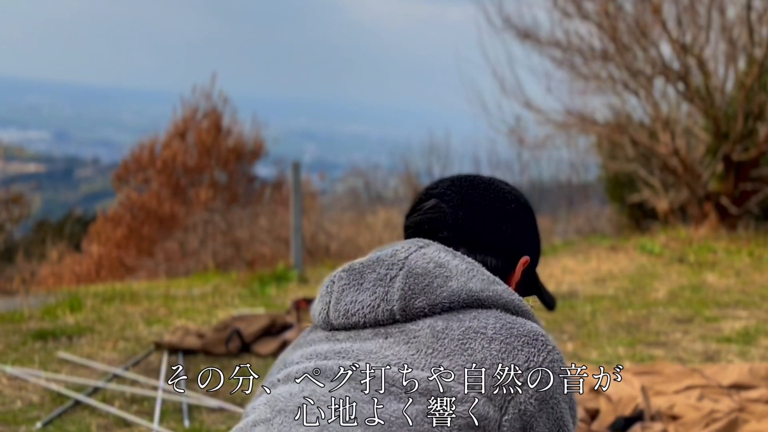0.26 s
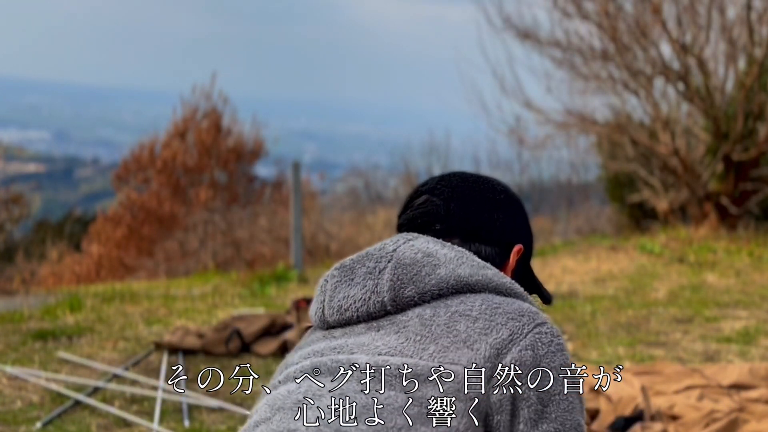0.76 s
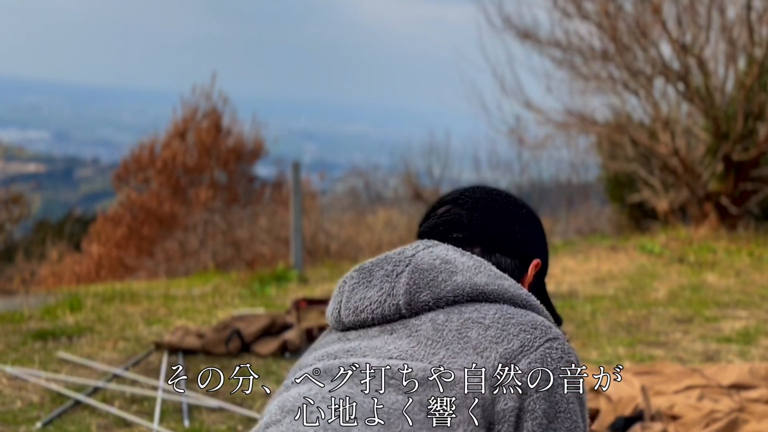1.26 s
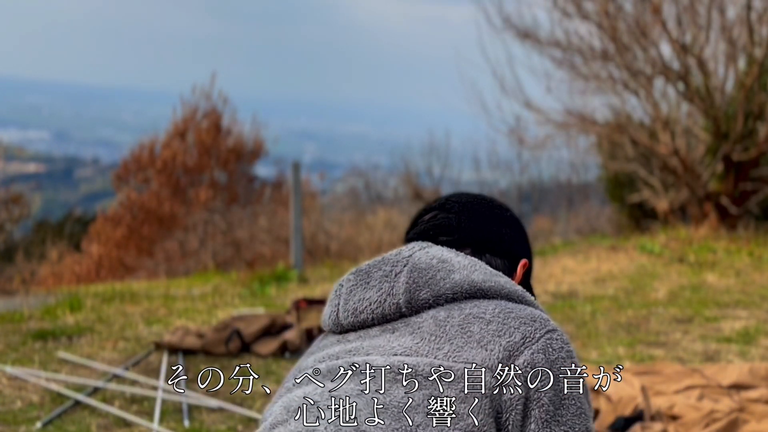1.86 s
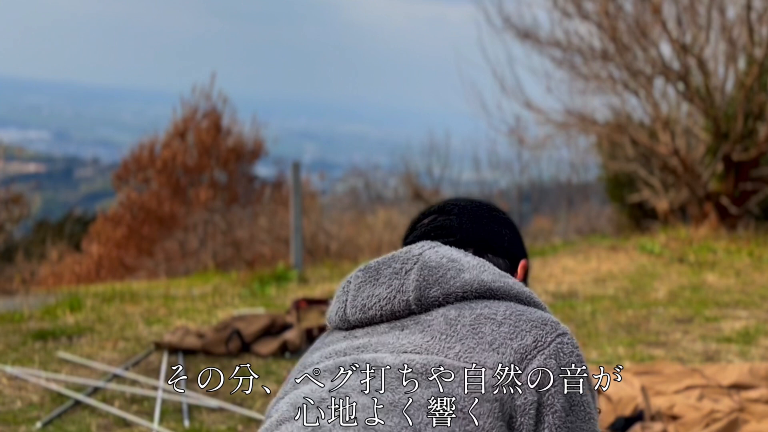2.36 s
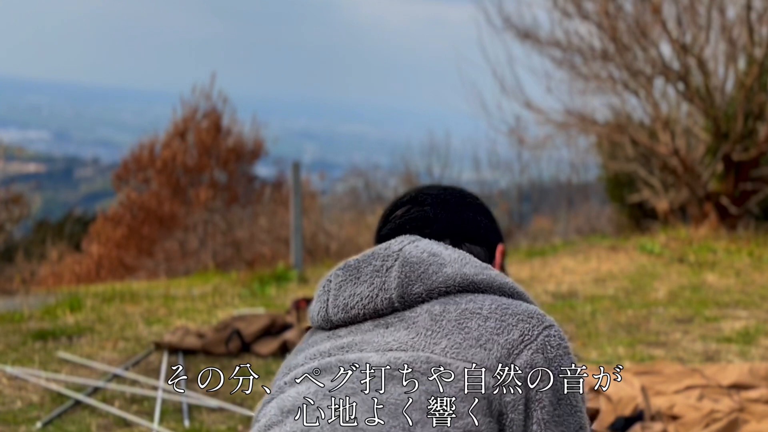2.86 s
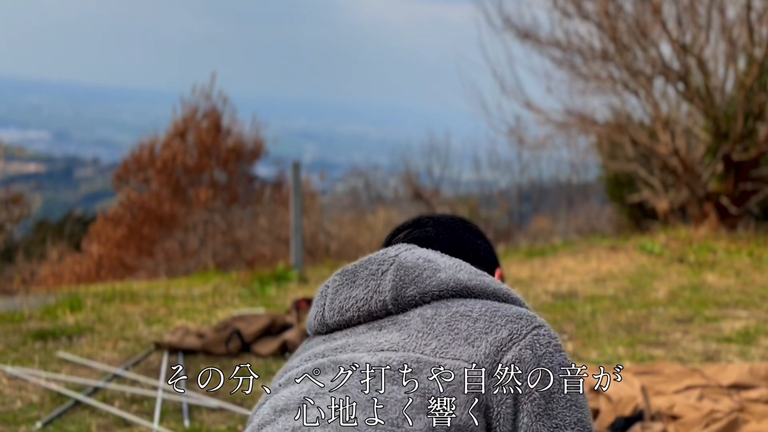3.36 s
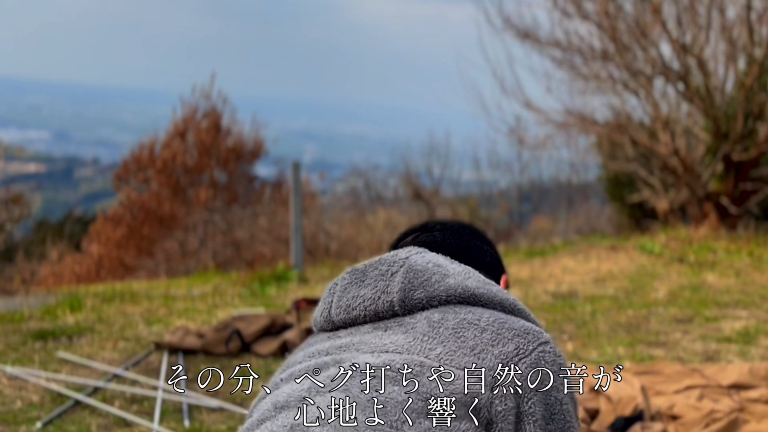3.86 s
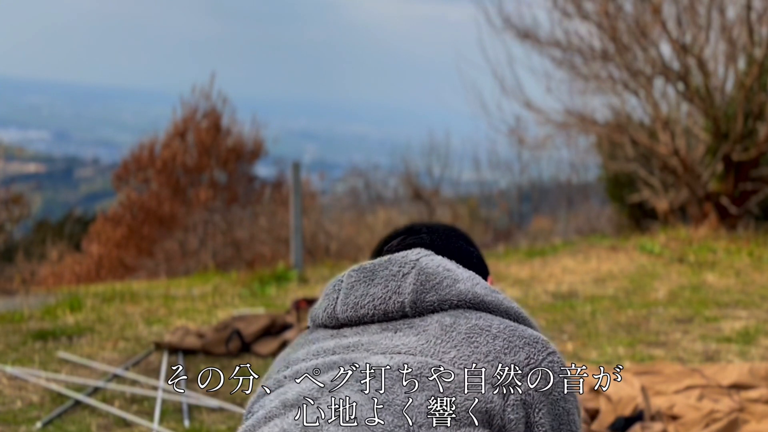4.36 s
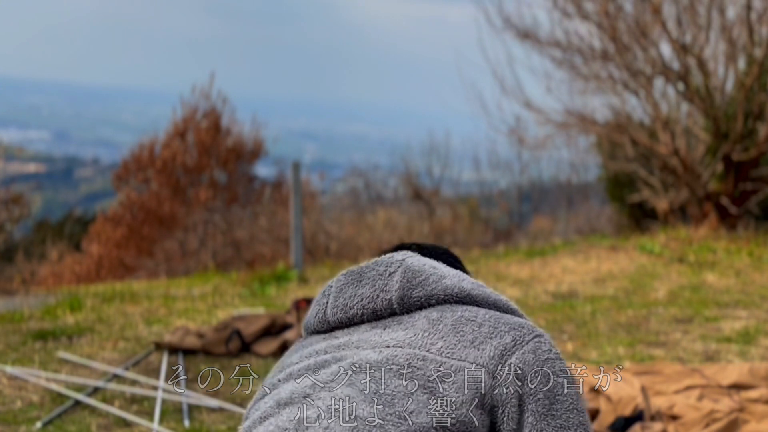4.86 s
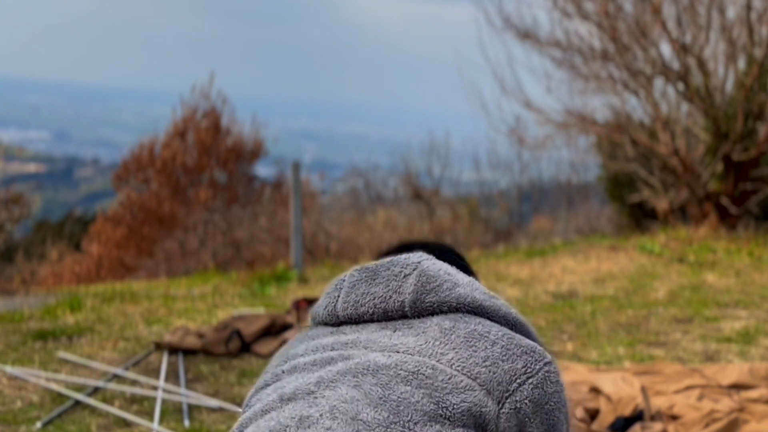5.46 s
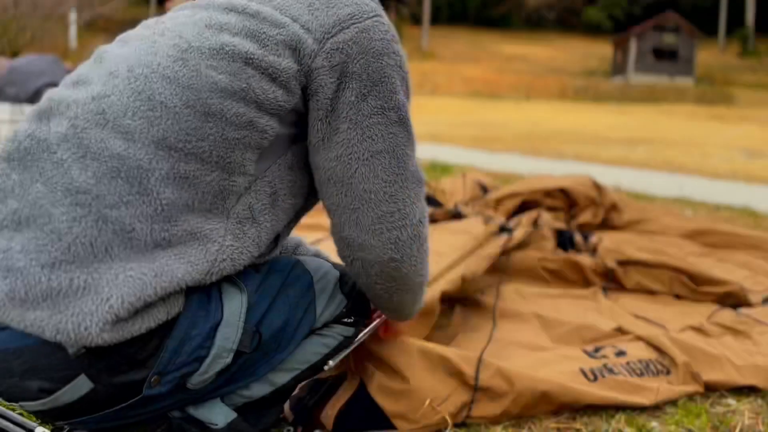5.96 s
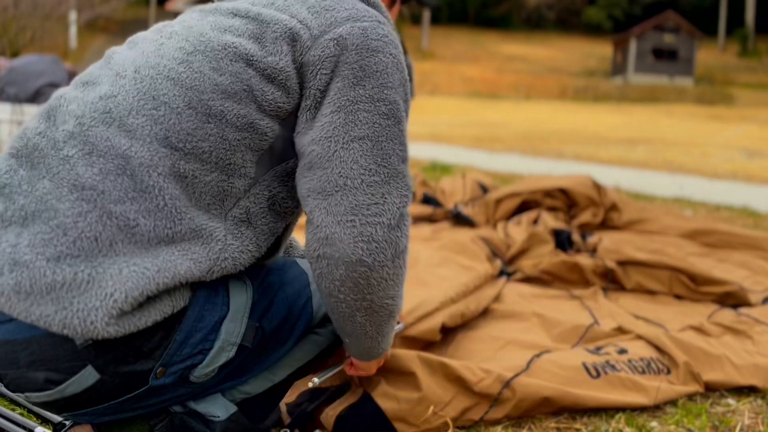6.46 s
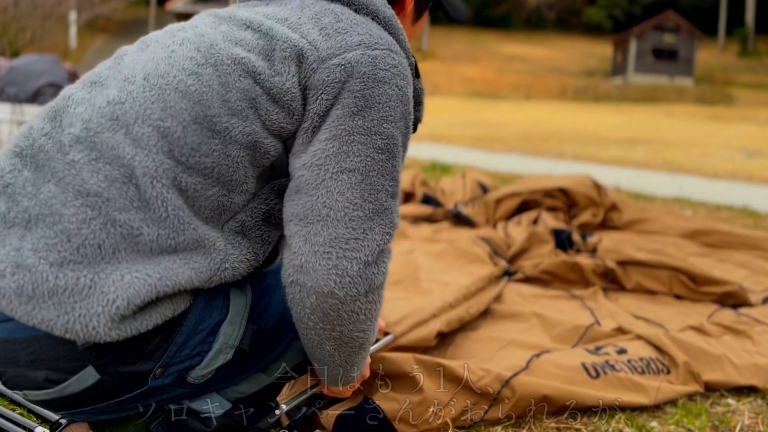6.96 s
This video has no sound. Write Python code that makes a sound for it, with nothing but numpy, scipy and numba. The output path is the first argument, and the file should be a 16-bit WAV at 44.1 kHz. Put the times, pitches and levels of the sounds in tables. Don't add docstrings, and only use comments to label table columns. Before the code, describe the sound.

A steel hammer drives a tent peg into turf with about a dozen loud, sharp ringing blows, then cloth rustles and soft knee thuds in a light breeze.

```python
import sys
import numpy as np
from scipy import signal
from scipy.fft import rfft, irfft, next_fast_len
from scipy.io import wavfile
from scipy.ndimage import uniform_filter1d
from numba import njit

SR = 44100
rng = np.random.default_rng(int(sys.argv[2]) if len(sys.argv) > 2 else 0)


def boost(x):
    u = np.asarray(x, float) / 20
    return 10 ** u


def dump(signal):
    limited = np.clip(np.atleast_2d(signal).T, -1, 1)
    pcm = np.round(limited * 32767).astype(np.int16)
    wavfile.write(sys.argv[1], SR, pcm)


N = 317730


@njit
def svf(x, hz, width):
    y, b, l = np.empty(len(x)), 0., 0.
    g, k = np.tan(np.pi * hz / SR), width / hz
    for i in range(len(x)):
        v = (b + g * (x[i] - l)) / (1 + g * (g + k))
        b, l, y[i] = 2 * v - b, l + 2 * g * v, k * v
    return y


def unit(x):
    return x / np.sqrt(np.mean(x ** 2))


def on_log_axis(table, count):
    hz, value = np.transpose(table)
    return np.interp(np.log(np.fft.rfftfreq(count, 1 / SR) + 1), np.log(hz + 1), value)


def coloured(table, x):
    gain = boost(on_log_axis(table, count=len(x)))
    return unit(irfft(rfft(x) * gain, len(x)))


def band(x, lo_hz, hi_hz):
    sos = signal.butter(2, [lo_hz, min(hi_hz, SR * .45)], "band", fs=SR, output="sos")
    return unit(signal.sosfilt(sos, x))


def curves(table):
    return np.interp(np.arange(N) / SR, *np.transpose(table))


def walk(rate):
    k = int(SR / rate)
    held = np.repeat(rng.standard_normal(N // k + 1), k)
    return 1.7 * uniform_filter1d(held, k)[:N]


def add(track, s, sound):
    i = int(s * SR)
    track[i:i + len(sound)] += sound[:N - i]


def fade(t, t60):
    return boost(-60 * t / t60)


def peaks(s, db, rise, fall):
    power = np.zeros(N // 64 + 2)
    t = np.arange(len(power)) * 64 / SR
    for s, db, rise, fall in np.broadcast(s, db, rise, fall):
        distance = np.where(t < s, (s - t) / rise, (t - s) / fall)
        power += boost(db - 20 * distance) ** 2
    return np.interp(np.arange(N) / SR, t, np.sqrt(power))


def full_blows():
    s = np.transpose(BLOWS)[0]
    return s[np.diff(s, prepend=0) > .2]


# (frequency [Hz], left lead [rad])
PORT_PHASE = [(0, 0), (600, .35), (2330, .5), (4050, .9), (5170, .2), (5860, -.7), (6550, -1.2),
              (7240, -2.1), (7750, -2.5), (8000, -3.14), (9200, -3.14), (9700, -4.5), (10700, -6.28),
              (12750, -6.3), (13440, -7.2), (14100, -8.2), (14800, -9.4)]
# (frequency [Hz], left minus right [dB])
PORT_BALANCE = [(100, 0), (1000, -1.5), (2400, -1), (3800, 3), (5200, 3), (6000, 1), (7500, 0), (20000, 0)]


def ports(x):
    count = next_fast_len(N)
    balance = boost(on_log_axis(PORT_BALANCE, count=count) / 2)
    turn = balance * np.exp(.5j * on_log_axis(PORT_PHASE, count=count))
    return np.array([irfft(rfft(x, count) * g, count)[:N] for g in (turn, 1 / turn)])


# (frequency [Hz], spectral density [dB])
AIR_SPECTRUM = [(71, -41), (120, -10.5), (156, 1), (179, -22), (392, -23.5), (647, -23.5), (807, -38.5),
                (2530, -42.5), (3030, -39.5), (3490, -51), (9330, -44.5), (14500, -66)]


def air():
    mid, side = (coloured(AIR_SPECTRUM, rng.standard_normal(N)) for _ in range(2))
    drone = boost(-57) * unit(svf(rng.standard_normal(N), 149., 12.))
    return boost(-52.5) * (ports(mid) + .6 * side * np.array([[1], [-1]])) + drone


# (frequency [Hz], spectral density [dB])
RUMBLE = [(12, -56.5), (20, -17.5), (40, -1.5), (59, 5.5), (73, 4), (108, -3.5), (144, -11.5), (220, -22.5),
          (290, -44), (480, -120)]
# (time [s], level [dB])
BREEZE = [(0.0, -47.5), (0.45, -40), (0.75, -45.5), (1.3, -41), (1.8, -45), (2.5, -41.5), (3.0, -32.5),
          (3.4, -44.5), (4.1, -36.5), (4.47, -42.5), (4.75, -32.5), (4.89, -44.5), (5.2, -28), (5.3, -47.5),
          (5.6, -25.5), (5.9, -44), (6.3, -36), (7.12, -37)]
# (time [s], rumble level [dB], flutter over rumble [dB], length [s])
BUFFETS = [(0.04, -45, -4, 0.29), (1.73, -41, -9, 0.18), (1.917, -32, -25, 0.05), (2.249, -52.5, -15, 0.08),
           (3.31, -34.5, -19.5, 0.039), (4.982, -25, -39, 0.074), (5.514, -21.5, -29, 0.14),
           (5.729, -28, -5, 0.14), (6.055, -49, 9.5, .1), (6.163, -23, -20, 0.03),
           (6.428, -42.5, 2.5, 0.032), (6.686, -37, -9.5, 0.035), (7.191, -36, -7.5, 0.11)]


def wind():
    breeze = boost(curves(BREEZE))
    s, db, flutter_db, length = np.transpose(BUFFETS)
    blow_s, _, thump_db = np.transpose(BLOWS)[:3]
    jolt_s = blow_s + .01
    later = np.arange(N) / SR > 5.87
    breeze_flutter = breeze * boost(-25.5 + 15.5 * later)
    rumble_gain = breeze + peaks(s, db, length, length) + peaks(jolt_s, thump_db - 15, .059, .088)
    flutter_gain = (breeze_flutter + peaks(s, db + flutter_db, length, length)
                    + peaks(jolt_s, thump_db - 29.5, .04, .099))
    out = []
    for side_db in (0, -17):
        rumble = rumble_gain * boost(1.5 * walk(14)) * coloured(RUMBLE, rng.standard_normal(N))
        gusts = band(band(rng.standard_normal(N), 110, 430), 110, 430)
        flutter = flutter_gain * boost(1.2 * walk(32)) * gusts
        out.append(boost(side_db) * (rumble + flutter))
    return np.array([out[0] + out[1], out[0] - out[1]])


# (time [s], shake level [dB], brightness [dB])
SHAKES = [(1.33, -53, 6.5), (1.73, -50.5, 5), (2.099, -49, 4), (2.442, -49.5, 4), (2.809, -48.5, 5.5),
          (3.191, -49, 3), (3.548, -42.5, -1), (3.929, -43, 0), (4.311, -45, 1.5), (4.7, -45.5, 1),
          (5.082, -45.5, -0.5), (5.481, -47, 1.5)]
# (time [s], body level [dB], brightness [dB], rise [s], fade [s])
RUSTLES = [(0.071, -52, -8.5, 0.6, 0.097), (0.3, -67.5, -15, 0.24, 1), (0.72, -71.5, -0.5, .4, 0.41),
           (1.884, -49, -16, 0.035, 0.12), (4.0, -54, -13, 0.055, 0.086), (4.77, -51, -14, 0.064, .1),
           (5.163, -48.5, -9.5, 0.098, 0.075), (5.613, -44, -8, 0.039, 0.25),
           (5.72, -32, -13.5, 0.054, .05), (5.82, -54.5, -0.5, .3, 0.6), (6.084, -36, -18.5, 0.094, 0.047),
           (6.31, -39.5, -20.5, 0.095, 0.19), (6.28, -70, 12, 0.029, .5), (6.56, -69, 15, 0.55, 0.13),
           (6.74, -66, 8.5, 0.2, .4), (6.867, -73, 17.5, 0.28, 0.089), (6.986, -54, 12, 0.01, .012),
           (7.064, -72.5, 18.5, 0.16, 0.09), (7.21, -64, 6, 0.041, .1)]


def cloth():
    shake_s, shake_db, shake_bright_db = np.transpose(SHAKES)
    fold_s, fold_db, fold_bright_db, rise, fall = np.transpose(RUSTLES)
    arm_s = full_blows() - .018
    shake_crisp_db, fold_crisp_db = shake_db + shake_bright_db, fold_db + fold_bright_db

    def shakes(db, fade_s, lift_db=-23):
        return peaks(shake_s, db, .02, fade_s) + peaks(shake_s + .11, db + lift_db, .05, .01)

    body_gain = (shakes(shake_db, .17) + peaks(fold_s, fold_db, rise, fall)
                 + peaks(arm_s, -58.5, .021, .031))
    crisp_gain = (shakes(shake_crisp_db, .21) + peaks(fold_s, fold_crisp_db, rise, fall)
                  + peaks(arm_s, -58.5 - 13.5, .021, .046))
    sheen_gain = (shakes(shake_crisp_db - 3.5, .11, lift_db=-25.5)
                  + peaks(fold_s, fold_crisp_db - 4.5, rise, fall))
    out = []
    for side_db in (0, -8):
        low, mid, hiss = rng.standard_normal((3, N))
        creases = boost(1.8 * rng.exponential(size=N) + 2 * walk(200))
        folds = band(low * creases, 480, 1900) + .55 * unit(svf(low, 1270., 300.))
        body = body_gain * boost(1.2 * walk(40)) * folds
        patches_db = 2.5 * unit(uniform_filter1d(low, size=700))
        middle_gain = np.sqrt(body_gain * crisp_gain) * boost(3.5 + .4 * walk(50))
        middle = middle_gain * band(mid * creases, 2000, 4300)
        crisp = crisp_gain * boost(.56 + .97 * walk(36)) * band(hiss, 3900, 7600)
        sheen = band(band(hiss, 7400, 14400), 7400, 14400) * (side_db == 0)
        out.append(boost(side_db) * (body + middle + crisp + sheen_gain * boost(8 + patches_db) * sheen))
    return ports(out[0]) + np.array([out[1], -out[1]])


# (time [s], peak level [dB], first pitch [Hz])
THUDS = [
    (6.449, -18.5, 151),
    (6.587, -20, 192),
    (6.664, -18, 326),
    (7.164, -17.5, 70.1),
]


def thuds():
    out, t = np.zeros(N), np.arange(int(.15 * SR)) / SR
    end_hz, sink_s = 51.8, .0092
    for s, db, hz in THUDS:
        turns = end_hz * t + (hz - end_hz) * sink_s * (1 - np.exp(-t / sink_s))
        wave = np.sin(2 * np.pi * turns) * (1 - np.exp(-t / .0018))
        add(out, s, boost(db) * wave * fade(t, .27))
    return out


# (time [s], peak level [dB], pitch [Hz], brightness [dB])
TICKS = [(0.026, -43, 2225, 7), (0.0899, -48.5, 2710, 6), (0.173, -48.5, 2220, -11.5),
         (0.2605, -42, 2400, -11.5), (0.508, -58.5, 2940, -4.5), (0.7598, -43, 2420, -20),
         (1.128, -48.5, 2800, -32), (1.625, -42, 2260, -15.5), (1.7923, -43, 2230, -5),
         (1.8879, -27.5, 2400, -12), (2.2409, -28.5, 2485, -7.5), (2.5657, -37.5, 2390, -4.5),
         (2.999, -26, 2480, -7), (3.299, -39.5, 2580, -5), (3.3536, -29.5, 2490, -10.5),
         (3.757, -35, 2500, -23.5), (4.0563, -38, 3040, -20.5), (4.1235, -33.5, 2570, 3),
         (4.4976, -31, 2590, -9.5), (4.8987, -28, 2330, -0.5), (5.1018, -36.5, 2790, 0),
         (5.6145, -29.5, 3300, -16.5), (5.6911, -33.5, 1940, -31), (5.709, -22.5, 3250, -18.5),
         (5.7348, -26, 2220, -16), (5.9696, -45.5, 3370, 3.5), (6.0533, -31.5, 2610, -22),
         (6.0692, -29, 1900, -15), (6.0856, -27.5, 2070, -35.5), (6.985, -33.5, 3760, -21)]


def ticks():
    out, t = np.zeros(N), np.arange(int(.04 * SR)) / SR
    for s, db, hz, bright_db in TICKS:
        spark = rng.standard_normal(len(t)) * fade(t, .006)
        low = svf(spark, 1. * hz, 380.)
        high = svf(spark, 4450., 650.) + .08 * spark
        tick = low / np.abs(low).max() + boost(bright_db + 6) * high / np.abs(high).max()
        add(out, s - .0003, boost(db + 2.5) * tick)
    return out


def swing():
    out, t = np.zeros(N), np.arange(int(.026 * SR)) / SR
    whistle = boost(-36) * np.sin(2 * np.pi * 1650 * t) * (t / t[-1]) ** 3.5
    for before, blow in zip([(0,)] + BLOWS, BLOWS):
        add(out, blow[0] - t[-1], whistle * (blow[0] - before[0] > .2))
    return out


def ring(modes, t, chance):
    total = 0
    for (hz, db, t60), c in zip(modes, chance):
        tone = np.sin(2 * np.pi * hz * (1 + .001 * c) * t + 9 * c)
        total = total + boost(db + 1.5 * c) * tone * fade(t, t60)
    return total


# (frequency [Hz], level [dB], t60 [s])
LOW_RING = [(4068, 0, .135), (4059, -32, .62), (4950, -31, .3), (2410, -24, .1)]
# (frequency [Hz], level [dB], t60 [s])
HIGH_RING = [(7584, 0, .3), (7566, -11, .4)]
# (frequency [Hz], level [dB], t60 [s])
TOP_RING = [(13575, 0, .17), (13530, -5, .15), (12476, -9, .17), (14160, -9, .15)]
# (time [s], low ring [dB], high ring [dB], top ring [dB], grip damping [dB/s])
RINGS = [(1.298, -9.5, -16.5, -26, -1.5), (1.69, -21.5, -9, -28.5, -24.5),
         (2.052, -24, -22.5, -28.5, -39.5), (2.41, -13.5, -16, -17.5, -0.5), (2.782, -26, -27.5, -23.5, 15),
         (2.787, -12.5, -37, -46, 170), (3.144, -22.5, -25, -29, 18.5), (3.521, -7.5, -18, -24.5, 3.5),
         (3.902, -5, -21.5, -37.5, 25.5), (4.273, -31.5, -21, -30, 38.5), (4.655, -28.5, -25.5, -40, 53.5),
         (4.671, -21.5, -44.5, -47, 18.5), (5.05, -15.5, -37.5, -34, -42.5),
         (5.442, -13.5, -18, -35, -39.5), (5.855, -54, -33, -33.5, 57)]


def head():
    out, t = np.zeros(N), np.arange(int(.45 * SR)) / SR
    families = (LOW_RING, HIGH_RING, TOP_RING)
    for s, low_db, high_db, top_db, grip_db in RINGS:
        chance = rng.standard_normal((3, 4))
        levels = (low_db, high_db, top_db)
        tones = sum(boost(db) * ring(modes, t, c) for db, modes, c in zip(levels, families, chance))
        add(out, s, tones * (1 - np.exp(-t / .002)) * boost(-max(grip_db, -35) * t))
    return out * boost(1.4 * walk(45))


# (frequency [Hz], spectral density [dB])
SPRAY = [(180, -30), (300, 4), (1000, -16), (3000, -10.5), (7000, -17.5), (13500, -19.5), (15500, -44)]


def soil(t, dust, crack_db, thump_db):
    turns = 90 * t + 2 * (1 - np.exp(-t / .0069))
    swell = 1 - np.exp(-(t / .0077) ** 2)
    thump = np.sin(2 * np.pi * turns + 1.3) * swell * fade(t, .075)
    spray = boost(-18.5) * coloured(SPRAY, dust) * fade(t, .086) * (t > .002)
    return boost(thump_db + 12) * thump + boost(crack_db) * spray


# (frequency [Hz], width [Hz], level [dB])
CRACK_MODES = [(307, 120, -10), (587, 110, -9), (1005, 170, 1), (1685, 270, -9.5), (2330, 510, 1),
               (2970, 840, -1.5), (4157, 160, -9.5), (4810, 250, -16.5), (6860, 1200, -13),
               (7800, 330, -10), (9500, 900, -18), (12630, 450, -21), (14700, 220, -10.5),
               (2520, 450, -12.5)]


def crack(t, grit, dust, crack_db, knock_db, clank_db):
    light_db = min(crack_db, 0)
    contact_s = (3.6 if crack_db > -3 else 9.8) / 1000 * boost(.53 * light_db)
    touch = np.where(t < .002, boost(-33.5), 1)
    chatter = grit * np.abs(dust) * touch * fade(np.maximum(t - .002 - contact_s, 0), .0051)
    total = 0
    for k, (hz, width, db) in enumerate(CRACK_MODES):
        if hz < 1400:
            spot_db = knock_db
        elif hz < 3500:
            spot_db = clank_db
        else:
            spot_db = -9 if hz < 5500 else -6.5 + .19 * light_db
        shifted_hz = hz * (1 + .035 * np.tanh(grit[k]))
        total = total + (-1) ** k * boost(db + spot_db) * unit(svf(chatter, shifted_hz, 1. * width))
    return total / np.abs(total).max()


# (time [s], crack [dB], soil thump [dB], knock [dB], clank [dB])
BLOWS = [(1.292, -2, -30.5, -18.5, -11), (1.303, -12.5, -28, -27, -15), (1.685, 1.5, -29, -15.5, -7.5),
         (1.69, -6.5, -31, -23.5, -14), (1.696, -7, -49.5, -12.5, -7.5), (2.047, 2, -35.5, -28, -12),
         (2.053, -7.5, -12.5, -9, -11), (2.089, -16, -18, -19, -12.5), (2.404, 4, -11.5, -15, -12),
         (2.772, 7.5, -10, -11.5, -8), (2.783, -23, -24.5, -23, -9.5), (3.14, 7, -10, -11.5, -4.5),
         (3.168, -14, -20.5, -20, -4.5), (3.513, 4.5, -10.5, -12, -9), (3.896, 9.5, -8.5, -15.5, -9),
         (4.269, 7, -13, -13.5, -10), (4.2928, -13.5, -19.5, -19, -14), (4.647, 7.5, -9.5, -11, -10.5),
         (4.668, -15, -17.5, -18, -10.5), (5.042, 9, -8, -16.5, -11.5), (5.436, 7, -11, -12, -9.5),
         (5.851, -5, -27.5, -10, -11)]


def hammer():
    out, t = np.zeros(N), np.arange(int(.3 * SR)) / SR
    for s, crack_db, thump_db, knock_db, clank_db in BLOWS:
        grit, dust = rng.standard_normal((2, len(t)))
        steel = boost(crack_db + 7) * crack(t, grit, dust, crack_db, knock_db, clank_db)
        add(out, s - .002, steel + soil(t, dust, crack_db, thump_db))
    return out


def scene():
    near = hammer() + head() + swing() + ticks() + thuds()
    return ports(near) + cloth() + wind() + air()


def roll_off(x):
    return signal.sosfilt(signal.butter(12, 15690, fs=SR, output="sos"), x)


def record(dry):
    overloaded = np.clip(dry, -1.1, 1.1)
    cut = signal.sosfilt(signal.butter(8, 15300, fs=SR, output="sos"), overloaded)
    return roll_off(np.clip(cut, -1, 1))


dry = scene()
out = record(dry)
dump(out)
```